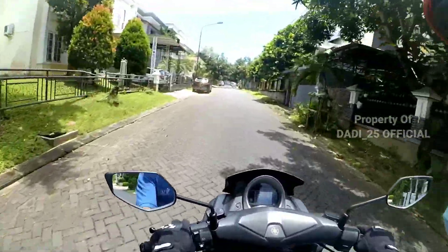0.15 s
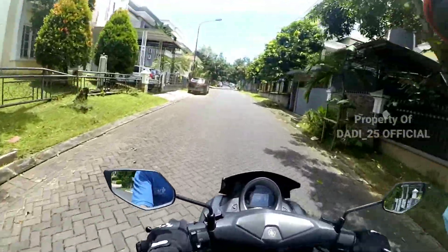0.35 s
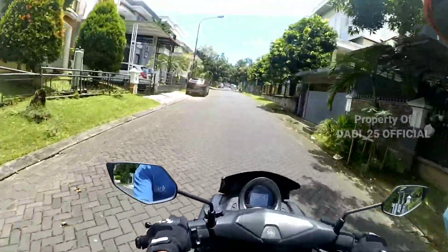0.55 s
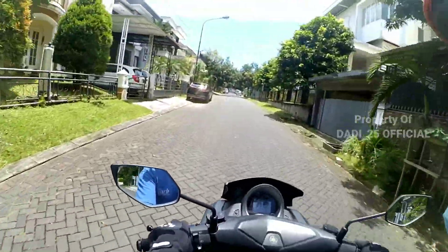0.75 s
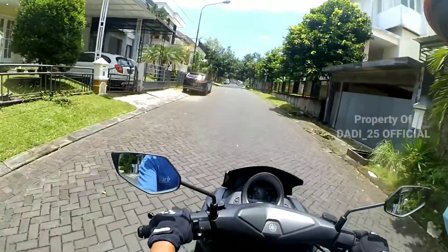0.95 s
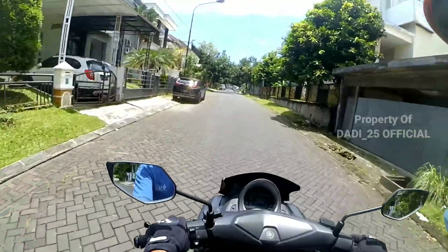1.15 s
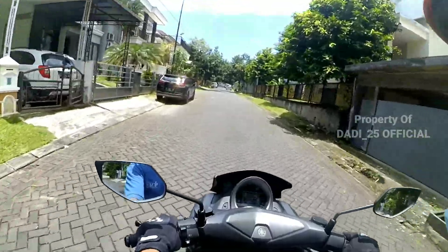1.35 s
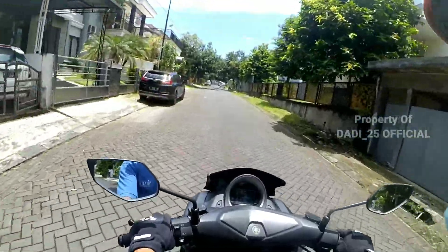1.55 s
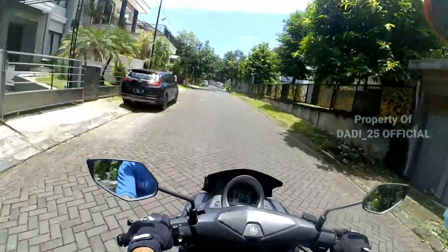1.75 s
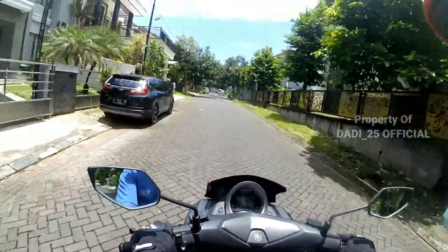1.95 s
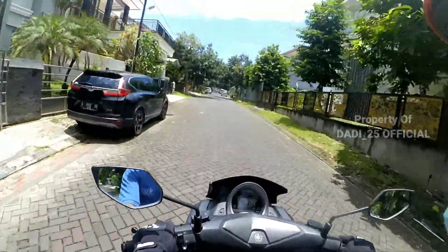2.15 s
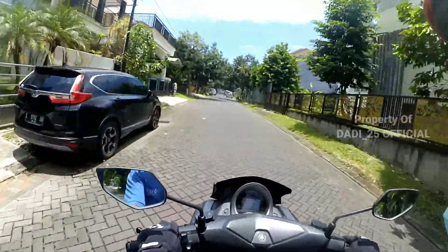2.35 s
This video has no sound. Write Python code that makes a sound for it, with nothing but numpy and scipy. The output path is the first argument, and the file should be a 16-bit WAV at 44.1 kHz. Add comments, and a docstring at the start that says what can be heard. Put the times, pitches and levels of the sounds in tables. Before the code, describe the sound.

A small scooter engine hums at an even speed throughout, slightly raspy and heard from the rider's seat over a rush of tyres and air. From about 0.4 seconds, uneven paving gives the chassis soft thumps, strongest near 1.8 seconds along with a very low microphone rumble. Loose bodywork ticks faintly now and then, and the ride grows a little louder up to the end at 2.5 seconds.

```python
"""A scooter's single-cylinder four-stroke engine hums at an even speed, heard from the rider's seat.
The exhaust puffs once a cycle; combustion and valves each make the engine casing knock and rasp.
Underneath, tyres and air rush, uneven paving blocks thump the chassis and loose bodywork ticks.
The swaying microphone adds a very low rumble, and the ride slowly grows a little louder."""
import sys
import numpy as np
from scipy import signal
from scipy.fft import rfft, irfft, next_fast_len
from scipy.io import wavfile
from scipy.ndimage import uniform_filter1d, map_coordinates

SR = 44100
rng = np.random.default_rng(int(sys.argv[2]) if len(sys.argv) > 2 else 0)


def generate_wav(sig):
    """Save sig (samples, or channels by samples) to the path in sys.argv[1] as 16-bit PCM at SR."""
    pcm = np.round(np.clip(np.atleast_2d(sig).T, -1, 1) * 32767).astype(np.int16)
    wavfile.write(sys.argv[1], SR, pcm)


N = 109897


def amp(db):
    """Turn a level in dB into a number to multiply by."""
    return 10 ** (np.asarray(db) / 20)


def unit(x):
    """Scale a signal so its average strength (rms) is 1."""
    return x / np.sqrt(np.mean(x ** 2) + 1e-20)


def seconds():
    """The time of each sample."""
    return np.arange(N) / SR


def curve(rows):
    """Join (time, value) points with straight lines."""
    return np.interp(seconds(), *np.transpose(rows))


def wobble(per_second):
    """A smooth curve through this many random points a second."""
    points = rng.standard_normal(int(N * per_second / SR) + 4)
    return map_coordinates(points, [seconds() * per_second], mode="mirror")


def filtered(x, response):
    """Multiply each frequency in x by response(hz)."""
    size = next_fast_len(N + SR // 2)
    hz = np.fft.rfftfreq(size, 1 / SR)
    return irfft(rfft(x, size) * response(hz), size)[:N]


def coloured(x, spectrum):
    """Shape the bass and treble of x with (frequency, level) points, then scale to strength 1."""
    f, db = np.transpose(spectrum)
    return unit(filtered(x, lambda hz: amp(np.interp(np.log(hz + 1), np.log(f + 1), db))))


def patchy_noise(depth_db):
    """Noise with random louder and softer patches across time and pitch."""
    spectra = signal.stft(rng.standard_normal(N), nperseg=512)[2]
    patches = uniform_filter1d(rng.standard_normal(spectra.shape), size=5, axis=0)
    patches = uniform_filter1d(patches, size=10, axis=1)
    return signal.istft(spectra * amp(depth_db * unit(patches)), nperseg=512)[1][:N]


# How strongly the microphone sways: t/s, level/dB
SWAY_LEVEL = [(0, -26), (.2, -29), (.3, -21), (.9, -27.5), (1.35, -21), (1.42, -16), (1.82, -12.5),
              (1.9, -22.5), (2.3, -17.5), (2.49, -31)]
# Tone colour of its rumble: f/Hz, relative level/dB
RUMBLE_COLOUR = [(2, -12.5), (12, 9), (22, 5), (40, -5), (90, -42), (300, -75.5), (1500, -130)]

def microphone_sway(shake_hz=11.5, wander_swings=.2, rumble_share=.55):
    """The microphone shakes slowly and unevenly, with a deep rumble."""
    swings = shake_hz * seconds() + wander_swings * wobble(8)
    shake = unit(np.sin(2 * np.pi * swings))
    rumble = coloured(rng.standard_normal(N), RUMBLE_COLOUR)
    return amp(curve(SWAY_LEVEL)) * unit(shake + rumble_share * rumble)


# How loud the tyres hiss: t/s, level/dB
TREAD_LEVEL = [(0, -64.5), (.6, -63.5), (1.0, -64), (1.3, -62.5), (1.62, -62.5), (1.82, -60), (2.02, -61),
               (2.15, -61.5), (2.49, -60.5)]
# Tone colour of the hiss: f/Hz, relative level/dB
TREAD_COLOUR = [(1500, -30.5), (3200, -2), (4400, 1), (5500, -0.5), (7000, -9), (10000, -20.5),
                (15000, -34)]

def tread_hiss():
    """The tyre tread hisses thinly, rising and easing with the surface."""
    return amp(curve(TREAD_LEVEL)) * coloured(rng.standard_normal(N), TREAD_COLOUR)


# Bodywork ticks: t/s, level before filtering/dB, f/Hz, band width/Hz
PLASTIC_TICKS = [(.256, -46, 3900, 2000), (.603, -38, 4700, 1600), (.684, -42.5, 5700, 2500),
                 (.891, -46, 5300, 2000), (1.15, -40, 4500, 1600), (1.23, -62, 13600, 1600),
                 (1.735, -59, 14000, 2800), (1.85, -49, 4400, 2000), (2.002, -56, 11700, 1600),
                 (2.009, -47, 5000, 2000), (2.109, -56, 8600, 1200)]

def bodywork_ticks(fade_s=.03):
    """Loose plastic ticks faintly: each tick is a burst of noise ringing around one pitch."""
    out = np.zeros(N)
    for start, db, pitch, width in PLASTIC_TICKS:
        age = seconds() - start
        fade = amp(db - 60 * np.abs(age) / fade_s) * (age >= 0)
        burst = fade * rng.standard_normal(N)
        # Squaring the filter makes the sides of its band steeper.
        out += filtered(burst, lambda hz: (1j * hz * width / (pitch**2 - hz**2 + 1j * hz * width)) ** 2)
    return out


# Tone colour of tyres and air: f/Hz, relative level/dB
RUSH_COLOUR = [(20, -54), (45, -48.5), (80, -54), (150, -55), (250, -59.5), (400, -61.5), (470, -63.5),
               (600, -60.5), (720, -63.5), (820, -70), (960, -64.5), (1250, -73), (1420, -74.5),
               (1530, -79), (1650, -75), (1850, -77), (2200, -83.5), (2450, -80.5), (2530, -85.5),
               (2660, -82.5), (2720, -89.5), (3300, -96.5), (4900, -102), (7000, -109), (10000, -116),
               (15000, -121)]

def road_rush():
    """Tyres rolling on the paving and passing air make an even rush."""
    return amp(-28) * coloured(patchy_noise(depth_db=.82), RUSH_COLOUR)


# Jolts from the paving, each at its loudest moment: t/s, level/dB, f/Hz
JOLTS = [(.405, -31, 830), (.572, -29, 800), (0.613, -22, 35.3), (0.811, -26, 189), (.874, -25.5, 276),
         (1.009, -24, 276), (1.33, -32, 214), (1.379, -27, 41.2), (1.4, -28, 278), (1.437, -20.5, 30.4),
         (1.466, -25.5, 233), (1.507, -26.5, 88), (1.582, -26, 39.5), (1.644, -32, 196), (1.749, -23, 230),
         (1.772, -17.5, 118), (1.826, -20, 33.4), (1.95, -23, 214), (2.063, -23.5, 71), (2.13, -28, 178),
         (2.246, -24, 298), (2.289, -30, 61.5)]
# Tone colour of the grit in a jolt: f/Hz, relative level/dB
GRIT_COLOUR = [(40, 7), (120, 0), (280, 0), (600, -12), (1200, -18), (3000, -50), (8000, -120)]

def chassis_thumps(half_length_swings=1.34, grit_db=-9.5):
    """Uneven blocks jolt the chassis: a few swings swell and fade, with a little gritty noise."""
    out = np.zeros(N)
    grit = amp(grit_db) * coloured(rng.standard_normal(N), GRIT_COLOUR)
    for middle, db, pitch in JOLTS:
        swings = (seconds() - middle) * pitch
        tone = np.cos(2 * np.pi * (swings + rng.random()))
        swell = np.exp(-(swings / half_length_swings) ** 2)
        out += amp(db) * swell * (tone + grit)
    return out


# The two blows in each engine cycle, combustion then valves: delay/cycles, relative level/dB
ENGINE_BLOWS = [(0, 0.5), (.45, -3)]
# Tone colour of gas and gear noise: f/Hz, relative level/dB
RASP_COLOUR = [(80, -23), (200, -2), (350, 1), (650, -7), (1100, -11), (1500, -23), (2500, -37),
               (3100, -43), (4800, -43), (8000, -52.5), (15000, -68.5)]

def engine_rasp(cycles, sharpness=2.66):
    """Gas and gear noise surges with every blow."""
    surges = np.zeros(N)
    for delay, db in ENGINE_BLOWS:
        angle = 2 * np.pi * (cycles - delay)
        surges += amp(db) * np.exp(sharpness * (np.cos(angle) - 1))
    return amp(-37) * unit(surges * coloured(rng.standard_normal(N), RASP_COLOUR))


# Tone colour of the ringing casing: f/Hz, relative level/dB
CASING_COLOUR = [(300, -39.5), (550, -6.5), (850, 0.5), (1000, -3), (1350, -7.5), (1500, -13.5),
                 (2000, -11), (2200, -23.5), (2450, -17), (2650, -16.5), (2750, -32), (5000, -40),
                 (9000, -68.5)]

def casing_knock(cycles, fade_s=.087, scatter_db=2):
    """Each of the two blows rings the casing its own way; only its strength varies between cycles."""
    age = np.arange(SR // 10) / SR
    out = np.zeros(N)
    for delay, db in ENGINE_BLOWS:
        hit_samples = np.flatnonzero(np.diff(np.floor(cycles - delay)) > 0)
        hits = np.zeros(N)
        hits[hit_samples] = amp(db + scatter_db * rng.standard_normal(N)[:len(hit_samples)])
        ring = rng.standard_normal(len(age)) * amp(-60 * age / fade_s)
        out += signal.fftconvolve(hits, ring)[:N]
    return amp(-46.5) * coloured(out, CASING_COLOUR)


# Tones of the exhaust and faint gear whine: multiple of the firing rate, usual level/dB
EXHAUST_TONES = [(1, -30), (2, -27), (3, -49.5), (4, -31.5), (5, -35), (6, -46), (7, -44), (8, -42.5),
                 (9, -46.5), (10, -40.5), (11, -47), (12, -38), (13, -57), (16, -47.5), (20, -53),
                 (22, -53.5), (26, -59.5), (40, -59.5), (41, -55)]
# Two droning tones rise and fall: t/s, level added to tone 4/dB, level added to tone 12/dB
DRONE_CHANGES = [(0, -3, 2), (.16, 4.5, 1.5), (.35, -.5, 0), (.55, -1.5, 1.5), (.72, -2, -7.5),
                 (.95, -1.5, 2.5), (1.2, 0.5, 4), (1.42, 1.5, -1.5), (1.85, 0, -0.5), (2.05, 2.5, 2),
                 (2.3, 1.5, -7), (2.49, 2.5, -3)]

def exhaust_hum(cycles, waver_db=.55, smear_radians=1.2):
    """Tones at multiples of the firing rate line up loosely into one puff a cycle."""
    times, low_db, upper_db = np.transpose(DRONE_CHANGES)
    drone_db = {4: np.interp(seconds(), times, low_db), 12: np.interp(seconds(), times, upper_db)}
    hum = np.zeros(N)
    for multiple, db in EXHAUST_TONES:
        phase = 2 * np.pi * multiple * cycles + smear_radians * rng.standard_normal()
        # Tone 2, the crankshaft's own, holds firm; tones further from it waver more.
        waver = waver_db * np.log2(multiple / 2) * wobble(6.25)
        level_db = db + drone_db.get(multiple, 0) + waver
        hum += np.sqrt(2) * amp(level_db) * np.cos(phase)
    return hum


# How often the engine fires: t/s, f/Hz
FIRING_RATE = [(0, 33.07), (.35, 32.92), (.7, 32.88), (.95, 33.0), (1.3, 32.98), (1.7, 33.11), (1.9, 33.19),
               (2.49, 33.23)]

def engine_cycles(first_firing=.25, jitter_cycles=.0015):
    """Count the cycles of the slightly unsteady engine; it fires at each whole number."""
    return np.cumsum(curve(FIRING_RATE)) / SR - first_firing + jitter_cycles * wobble(25)


def scene(hum_db_per_s=.32, ride_db_per_s=1.22):
    """One shaft keeps the engine sounds in step; engine and road slowly grow louder."""
    cycles = engine_cycles()
    from_middle_s = seconds() - seconds().mean()
    hum = amp(hum_db_per_s * from_middle_s) * exhaust_hum(cycles)
    ride = casing_knock(cycles) + engine_rasp(cycles) + road_rush()
    ride *= amp(ride_db_per_s * from_middle_s)
    return (hum + ride + tread_hiss() + microphone_sway() + chassis_thumps() + bodywork_ticks())[None]


def record(dry, top_hz=15500):
    """Cut away the very highest treble."""
    low_pass = signal.cheby1(14, .05, top_hz, fs=SR, output="sos")
    return signal.sosfiltfilt(low_pass, dry)


dry = scene()
out = record(dry)
generate_wav(out)
```